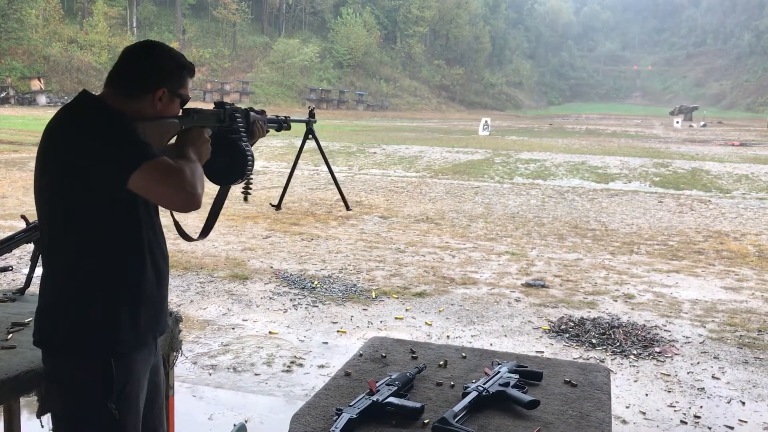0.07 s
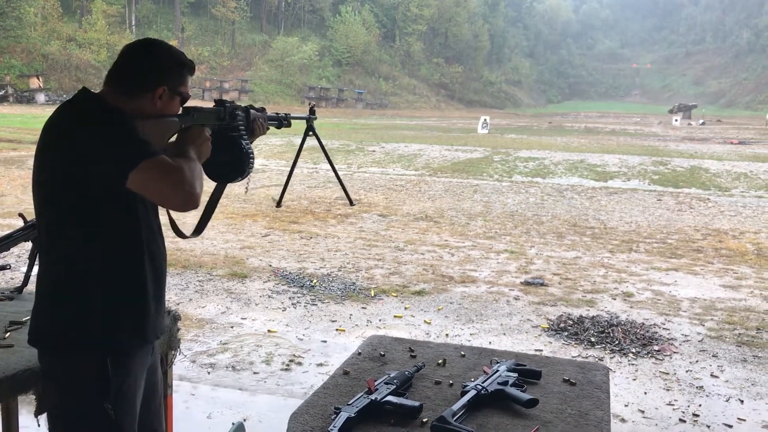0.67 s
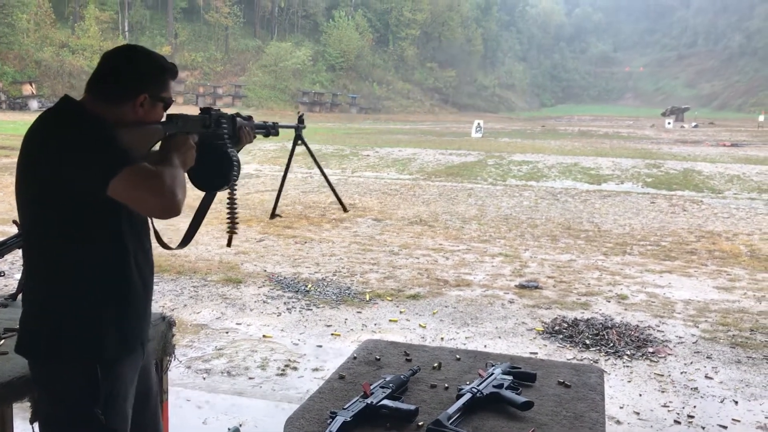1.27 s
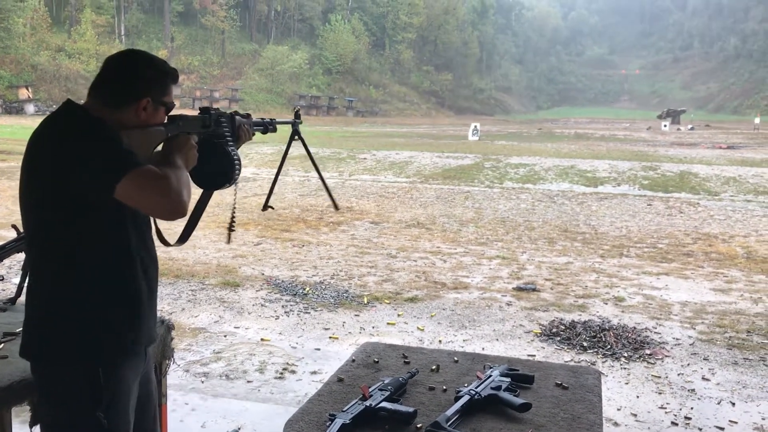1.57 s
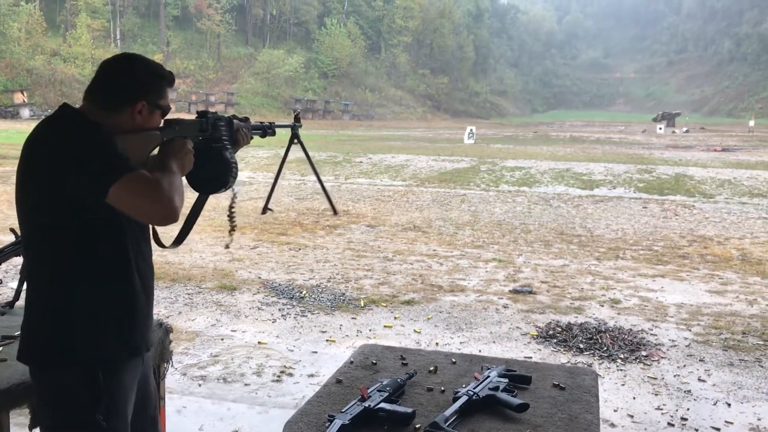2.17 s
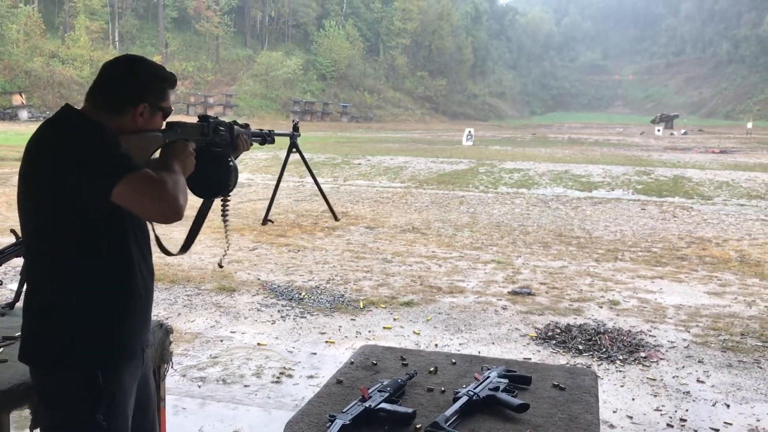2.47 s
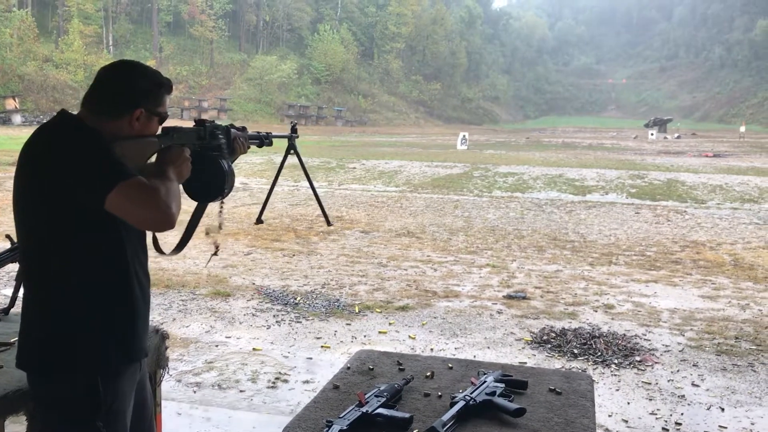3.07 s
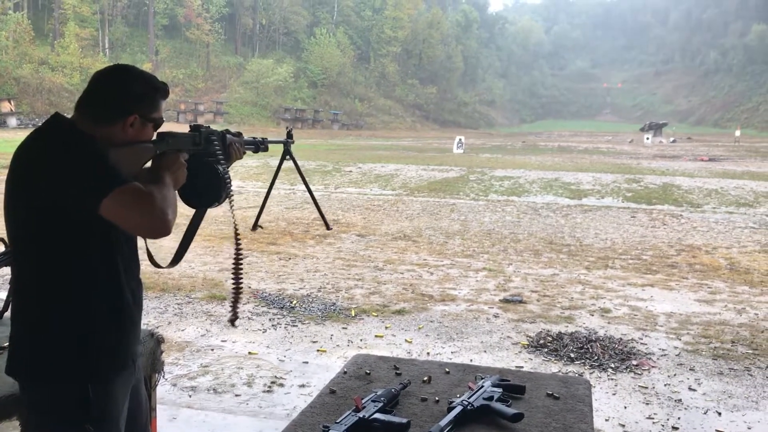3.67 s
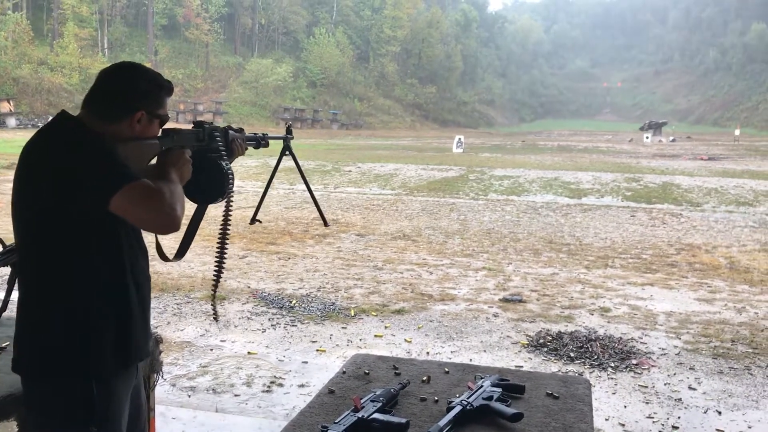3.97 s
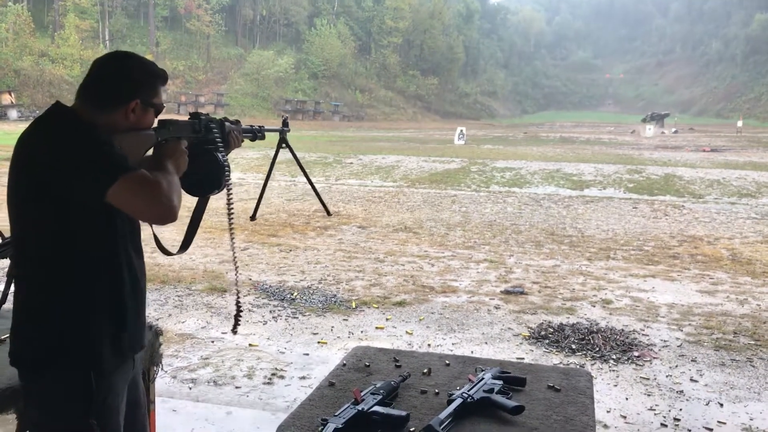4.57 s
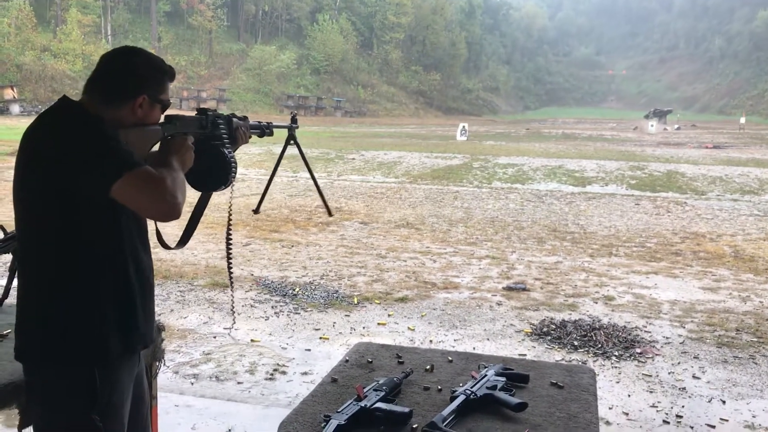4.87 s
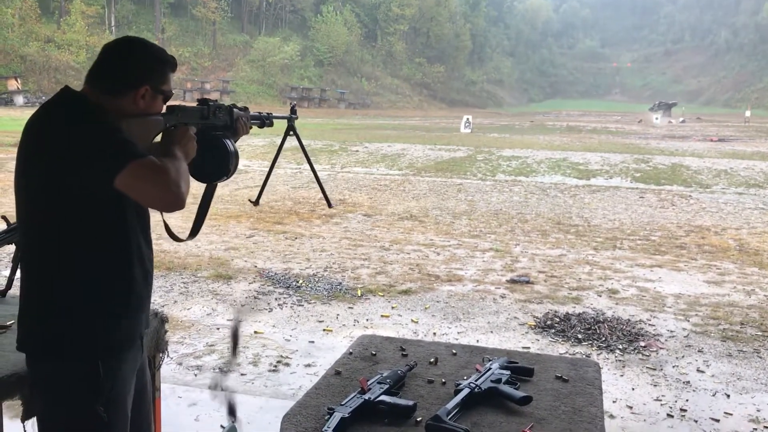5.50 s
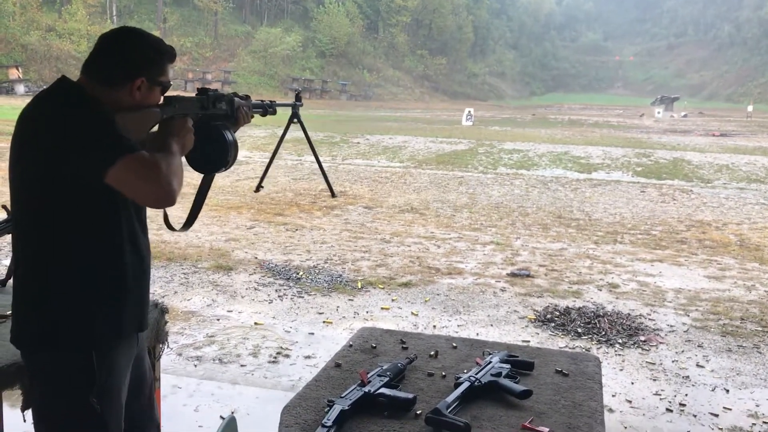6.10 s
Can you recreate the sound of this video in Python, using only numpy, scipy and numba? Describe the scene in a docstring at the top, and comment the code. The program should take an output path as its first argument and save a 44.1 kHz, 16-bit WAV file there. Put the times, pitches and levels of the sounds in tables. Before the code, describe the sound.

A belt-fed machine gun fires six short, rapid bursts, roughly one each second, the third being the longest. Each shot is a sharp, crackling blast that rings under the roof of an outdoor range. In the gaps, an echo washes back from wooded hills, with faint belt ticks, link jingles and the clink of a spent case. The close phone microphone squashes the loud bursts.

```python
"""A belt-fed machine gun fires six bursts under the roof of an outdoor range, two metres from a phone.
Each blast wave excites the same impulse response of the shelter, with fresh hiss from turbulent gas.
Feed, spent cases and belt tick and ring on impact; wooded hills scatter back a long wash over steady air.
The phone's gain control and limiter compress the bursts and let the wash swell back in the pauses."""
import sys
import numpy as np
from scipy import signal
from scipy.fft import rfft, irfft
from scipy.io import wavfile
from scipy.ndimage import uniform_filter1d
from numba import njit

SR = 44100
rng = np.random.default_rng(int(sys.argv[2]) if len(sys.argv) > 2 else 0)


def waveform_to_disk(signal):
    """Save audio, clipped to [-1, 1], as 16-bit WAV at the path in sys.argv[1]."""
    frames = np.transpose(np.atleast_2d(signal))
    scaled = np.clip(frames, -1, 1) * 32767
    samples = np.round(scaled).astype(np.int16)
    wavfile.write(sys.argv[1], SR, samples)


N = 279594
FFT_SIZE = 2 ** 19
FREQ = np.maximum(np.fft.rfftfreq(FFT_SIZE, 1 / SR), 1)
TIME = np.arange(N) / SR

# bursts of fire: (start [s], rounds [count], first bolt cycle [s], change per cycle [s])
BURSTS = [(.7418, 7, .0765, -.001), (1.9735, 6, .07, .00055), (2.955, 10, .0669, .00057),
          (4.2243, 4, .068, .0002), (5.0835, 4, .0646, .0015), (5.9248, 6, .0702, -.0005)]


def shots():
    """Periodic excitation with a drifting bolt cycle: rows of (time [s], blast [dB], gas [dB])."""
    # strength of each burst: (blast level [dB], gas level [dB])
    burst_levels = [(4, 8), (4.5, 8), (3, 8.5), (2, 7), (1, 6.5), (3, 9)]
    rows = []
    for (start, rounds, cycle_s, drift_s), (blast_db, gas_db) in zip(BURSTS, burst_levels):
        for k in range(rounds):
            rows.append((start + k * cycle_s + k * (k - 1) / 2 * drift_s, blast_db, gas_db))
    return np.array(rows)


def muzzle_blast(crackle_db=-1, build_s=0.00073, hold_s=0.0064, t60=0.15):
    """Blast wave: each pulse is a compression, then a rarefaction; turbulent gas adds a bright crackle."""
    # pressure pulses, shock front to low reflections: (delay [s], relative peak [dB], centre [Hz])
    pulses = [(.0022, 12.5, 2420), (.003, 12, 890), (.0058, 4, 168), (.011, -8, 77), (.055, 6, 340),
              (.059, -8, 73)]
    times, blast_db, gas_db = shots().T
    t = TIME[:SR // 4]
    wave = np.zeros(len(t))
    for delay, db, hz in pulses:
        phase = 2 * np.pi * hz * (t - delay)
        wave -= undb(db) * phase * np.exp((1 - phase ** 2) / 2)
    envelope = fade(np.maximum(t - hold_s, 0), t60) * (1 - np.exp(-t / build_s))
    turbulence = noise([(300, 1.5), (1500, 14), (4000, 13), (8000, 3.5), (15000, 6.0)])
    crackle = turbulence * repeat(envelope, times, undb(gas_db))
    return repeat(wave, times, undb(blast_db)) + undb(crackle_db) * crackle


def shelter_reverberation(level_db=12, scatter_db=1.6, resonance_width_hz=42.4):
    """Reverberation: a coherent response repeats with every shot; incoherent gas hiss adds in power."""
    # diffuse field: (frequency [Hz], spectral level [dB], build-up [s], t60 [s], coherent share [0-1])
    bands = [(45, -7, .003, 0.13, 0.6), (85.5, -5.5, 0.0024, 0.35, 0.26), (140, -4.5, 0.0027, 0.47, 0.5),
             (195, -3.5, 0.0031, 0.38, 0.16), (326, -1.5, 0.046, .52, 0.69), (630, 4.5, 0.015, 0.39, 0.97),
             (784, 5, 0.011, 0.43, 0.88), (1090, 1, 0.011, 0.41, 0.77), (1560, 2, 0.016, 0.33, 0.8),
             (2480, 6, 0.02, 0.29, 0.85), (2930, -2.5, 0.013, 0.37, 0.08), (6300, -8, 0.0044, 0.33, 0.5),
             (9600, -12.5, 0.00054, 0.3, 0.2), (15100, -27.5, 0.001, 0.3, 0)]
    # modes of the shelter: (frequency [Hz], level above the diffuse field [dB])
    modes = [(215, 2), (387, 7.5), (481, 7.5), (578, 7.5), (655, 7.5), (783, 3.5), (920, 6), (966, -0.5),
             (1015, 8.5), (1095, 6), (1232, 6.5), (1413, 4), (1520, 6.5), (1598, 4.5), (1788, 6), (1929, 6),
             (1986, 4), (2320, 6.5), (2410, 1)]
    times, blast_db, gas_db = shots().T
    blast_gains = undb(blast_db + scatter_db * rng.standard_normal(len(times)))
    walls = diffuse_reflections()
    wall_spectrum = rfft(walls, FFT_SIZE)
    gas_spectrum = rfft(rng.standard_normal(N), FFT_SIZE)
    t = TIME[:len(walls)]
    log_centres = np.log([row[0] for row in bands])
    response, hiss = np.zeros(len(t)), np.zeros(N)
    for selector, (hz, db, build_s, t60, coherent) in zip(np.eye(len(bands)), bands):
        band = np.interp(np.log(FREQ), log_centres, selector) * undb(db)
        envelope = swell(t, build_s, t60) * wall_echoes(t, hz)
        response += np.sqrt(coherent) * envelope * irfft(wall_spectrum * band)[:len(t)]
        gas_power = (1 - coherent) * repeat(envelope ** 2, times, undb(2 * gas_db))
        hiss += np.sqrt(gas_power) * irfft(gas_spectrum * band)[:N]
    ring = minimum_phase(sum(db * bell(hz, resonance_width_hz) for hz, db in modes))
    return undb(level_db) * filtered(repeat(response, times, blast_gains) + hiss, ring)


def diffuse_reflections(count=13, size=3072):
    """A diffuse field favours no pitch: successive stretches of flat spectrum and random phase."""
    phase = rng.uniform(0, 2 * np.pi, (count, size // 2 + 1))
    return irfft(np.exp(1j * phase)).ravel() * np.sqrt(size)


def wall_echoes(t, hz, octaves=0.4):
    """Early reflections: each wall briefly raises the gain of its own register after the shot."""
    # echoes from behind the shooter: (delay [s], spread [s], added gain [ratio], centre [Hz])
    clusters = [(.032, 0.0023, 0.85, 1200), (0.043, 0.0023, 0.81, 800), (.056, .003, 1.7, 380),
                (.06, 0.0023, 1.7, 2200)]
    return 1 + sum(gain * np.exp(-((t - delay) / spread) ** 2 - (np.log2(hz / centre_hz) / octaves) ** 2)
                   for delay, spread, gain, centre_hz in clusters)


def click(peak_db, hz, width_hz, t60):
    """Contact noise: a brief, decaying rattle is shaped by one resonance."""
    t, hz = TIME[:SR // 3], min(hz, .45 * SR)
    b, a = signal.iirpeak(hz, hz / min(width_hz, .3 * SR), fs=SR)
    rattle = rng.standard_normal(len(t)) * swell(t, 0.00023, t60)
    ring = signal.lfilter(b, a, signal.lfilter(b, a, rattle))
    return undb(peak_db) * ring / np.abs(ring).max()


def feed_clicks():
    """Impacts in the feed and belt excite broad, heavily damped resonances."""
    # impacts: (time [s], peak level [dB], centre [Hz], bandwidth [Hz], t60 [s])
    impacts = [(.014, -14, 2730, 2000, .023), (0.0876, -13, 3900, 2200, 0.029),
               (.182, -16, 3000, 2000, .03), (1.7274, -23, 5500, 9000, .025),
               (2.798, -20, 3030, 4010, 0.025), (2.8636, -24, 4500, 7000, .03),
               (2.943, -11, 4120, 2500, 0.075), (3.983, -12.5, 3200, 5000, 0.022),
               (4.052, -12, 2300, 3000, .04), (4.7048, -19, 4500, 6000, .03), (5.821, -21, 3800, 2000, .04),
               (5.888, -11.5, 2930, 2600, 0.062)]
    out = np.zeros(N)
    for s, db, hz, width_hz, t60 in impacts:
        add(out, s, click(db, hz, width_hz, t60))
    return out


def link_jingles(width_hz=700, t60=0.29, bounce_s=0.036, bounce_db=-3, contacts=3):
    """Inelastic bounces: loose links and empty belt ring on the floor in uneven, weakening contacts."""
    # jingles: (time [s], first peak level [dB], ring frequency [Hz])
    jingles = [(.03, -39, 12600), (.665, -37, 13400), (1.837, -40, 12500), (2.55, -37, 12700),
               (3.92, -39, 12400), (4.99, -40, 12700), (5.755, -33, 11400)]
    out = np.zeros(N)
    for s, db, hz in jingles:
        for k in range(contacts):
            stretch = rng.uniform(.6, 1.9)
            detune = 1 + 0.033 * rng.standard_normal()
            add(out, s + k * bounce_s * stretch, click(db + k * bounce_db, hz * detune, width_hz, t60))
    return out


def spent_cases(contact_db=-6):
    """Free vibration: brass cases strike concrete and ring in damped, inharmonic modes."""
    # landings: (time [s], peak level of the ring [dB])
    landings = [(2.693, -8.5), (2.742, -22)]
    # modes of a case: (frequency [Hz], relative level [dB], t60 [s])
    modes = [(2940, -4, 0.14), (3270, -7, 0.13), (4000, -6, 0.096), (4660, -13, .08), (5310, -2, 0.063),
             (7150, -3, 0.098), (9150, -18, 0.19), (11340, -28, .15), (12470, -25, .14)]
    out, t = np.zeros(N), TIME[:SR // 3]
    ring = sum(undb(db) * fade(t, t60) * np.sin(2 * np.pi * hz * t + rng.uniform(0, 2 * np.pi))
               for hz, db, t60 in modes)
    ring /= np.abs(ring).max()
    for s, db in landings:
        add(out, s, undb(db) * ring + click(db + contact_db, hz=3700, width_hz=3400, t60=0.21))
    return out


def belt_sway(from_s=0.46, until_s=.62, scatter_db=3, count=4):
    """Light collisions: the hanging belt swings on after a burst, each tick with a link's thin ring."""
    out = np.zeros(N)
    last_rounds = np.cumsum([burst[1] for burst in BURSTS]) - 1
    for end in shots()[last_rounds, 0]:
        for s in end + rng.uniform(from_s, until_s, count):
            tick = click(-21, hz=3000, width_hz=3500, t60=0.019)
            ring = click(-48, hz=12300, width_hz=700, t60=.17)
            if s < TIME[-1]:
                add(out, s, undb(scatter_db * rng.standard_normal()) * (tick + ring))
    return out


def knock(at_s=4.8335, half_length_s=0.0015):
    """A Gaussian wave packet, only a few cycles long, is heard as a dry knock."""
    # partials: (frequency [Hz], peak level [dB])
    partials = [(1120, -10), (2200, -13.5), (4000, -21)]
    t = TIME - at_s
    envelope = np.exp(-(t / half_length_s) ** 2)
    return envelope * sum(undb(db) * np.sin(2 * np.pi * hz * t) for hz, db in partials)


def hill_echo(near_db=-32.0, far_db=-29.5, split_hz=650):
    """Backscatter: near slopes return the low notes early, far trees the brighter part late."""
    # scattered sound: (frequency [Hz], relative spectral level [dB])
    spectrum = [(18, -75), (30, -63), (143, -6), (228, -4.5), (260, -1), (404, -2.5), (552, -13), (698, -8),
                (1370, -15), (2560, -12.5), (3070, -17.5), (5730, -22.5), (10200, -35), (12500, -38.5),
                (15000, -49)]
    scattered = noise(spectrum)
    low = filtered(scattered, 1 / (1 + (FREQ / split_hz) ** 4))
    near = undb(near_db) * wash_envelope(delay_s=0.37, spread=0.28, patchy_db=1.6) * low
    far = undb(far_db) * wash_envelope(delay_s=0.42, spread=0.32, patchy_db=0.35) * (scattered - low)
    return near + far


def wash_envelope(delay_s, spread, patchy_db, earlier_db=-2):
    """Incoherent summation: the echoes of all shots add in power, each peaking after delay_s."""
    t, times = TIME[::SR // 200], shots()[:, 0]
    earlier_times = -.27 - np.arange(6) / 14  # an earlier burst, heard only as its wash
    age = np.maximum(t[:, None] - np.r_[earlier_times, times], 1 / SR)
    strength = np.r_[np.full(len(earlier_times), undb(earlier_db)), np.ones(len(times))]
    power = np.exp(-.5 * (np.log(age / delay_s) / spread) ** 2) @ strength ** 2
    patches = undb(patchy_db * 2 * uniform_filter1d(rng.standard_normal(len(t)), size=5))
    return np.interp(TIME, t, np.sqrt(power) * patches)


def valley_air(air_db=-29.5, rumble_db=-52.0):
    """Ambient noise: the steady broadband air of the valley over a faint rumble."""
    # air: (frequency [Hz], relative spectral level [dB])
    spectrum = [(18, -43), (30, -71), (81, -10.5), (211, -3.5), (426, -5), (754, -6.5), (1410, -4.5),
                (2630, -5), (3980, -14.5), (6880, -24.5), (10400, -39), (12500, -54), (15000, -66)]
    rumble = noise([(30, -26), (90, 2), (200, -23), (800, -60)])
    return undb(air_db) * noise(spectrum) + undb(rumble_db) * rumble


def undb(db):
    """Amplitude ratio of a level in decibels."""
    return 10 ** (np.asarray(db) / 20)


def fade(t, t60):
    """Exponential decay, 60 dB down at t60."""
    return np.exp(-np.log(1000) * t / t60)


def swell(t, build_s, t60):
    """Gradual build-up followed by exponential decay."""
    return (1 - np.exp(-t / build_s)) ** 2 * fade(t, t60)


def filtered(x, gain):
    """Linear filtering: the spectrum is multiplied by a gain given on FREQ."""
    return irfft(rfft(x, FFT_SIZE) * gain)[:len(x)]


def minimum_phase(db):
    """Causality: the gain for a dB curve on FREQ that rings after a hit, never before."""
    cepstrum = irfft(db * np.log(10) / 20)
    cepstrum[1:FFT_SIZE // 2] *= 2
    cepstrum[FFT_SIZE // 2 + 1:] = 0
    return np.exp(rfft(cepstrum))


def bell(hz, width_hz):
    """Resonance curve of height 1 around a frequency."""
    return 1 / (1 + (2 * (FREQ - hz) / width_hz) ** 2)


def noise(spectrum):
    """Coloured noise of rms 1, shaped by points of (frequency [Hz], level [dB])."""
    hz, db = np.transpose(spectrum)
    x = filtered(rng.standard_normal(N), undb(np.interp(np.log(FREQ), np.log(hz), db)))
    return x / x.std()


def add(out, start_s, x):
    """Superposition of one sound on the mix."""
    i = int(start_s * SR)
    out[i:i + len(x)] += x[:len(out) - i]


def repeat(x, times, gains):
    """Convolution with an impulse train: the same sound at each of the times."""
    out = np.zeros(N)
    for s, gain in zip(times, gains):
        add(out, s, gain * x)
    return out


@njit
def follow(x, attack_s, release_s):
    """Envelope detection with separate time constants for rise and fall."""
    attack, release = 1 - np.exp(-1 / (attack_s * SR)), 1 - np.exp(-1 / (release_s * SR))
    out, level = np.empty(len(x)), 0.
    for i in range(len(x)):
        level += (abs(x[i]) - level) * (attack if abs(x[i]) > level else release)
        out[i] = level
    return out


def ride_gain(x, depth_db=9, threshold_db=-6):
    """Automatic gain control: the gain sinks through a loud burst and recovers in the pauses."""
    loud = uniform_filter1d(x ** 2, size=441) > undb(threshold_db) ** 2
    duck = follow(loud * 1., attack_s=.2, release_s=0.15)
    return x * undb(-depth_db * duck)


def limit(x, ceiling_db=2):
    """Look-ahead limiting: each shock front ducks the gain, then the shelter's ring swells back."""
    ahead = np.roll(x, -SR // 2000)
    level = follow(ahead, attack_s=.00006, release_s=0.025)
    gain = 1 / np.maximum(level / undb(ceiling_db), 1)
    return x * uniform_filter1d(gain, size=21)


def scene():
    """Superposition at one microphone, alike in both channels."""
    gunfire = shelter_reverberation() + muzzle_blast()
    valley = hill_echo() + valley_air()
    hardware = feed_clicks() + link_jingles() + spent_cases() + belt_sway()
    return np.tile(gunfire + valley + hardware + knock(), (2, 1))


def record(dry):
    """Compression and band limiting: the phone flattens the bursts and trims rumble and treble."""
    # notches of the microphone port: (frequency [Hz], width [Hz], gain [dB])
    notches = [(2900, 1130, -2), (4880, 190, -5.5), (7660, 290, -4), (10350, 1300, -4.5)]
    low_cut_hz, top_hz = 36, 15800
    x = signal.sosfilt(signal.butter(3, low_cut_hz, "high", fs=SR, output="sos"), dry[0])
    x = np.tanh(limit(ride_gain(x)))  # saturation rounds the peaks
    x = filtered(x, minimum_phase(sum(db * bell(hz, width_hz) for hz, width_hz, db in notches)))
    x = filtered(x, 1 / (1 + (FREQ / top_hz) ** 200))
    return np.tile(np.clip(x, -1, 1), (2, 1))


dry = scene()
out = record(dry)
waveform_to_disk(out)
```